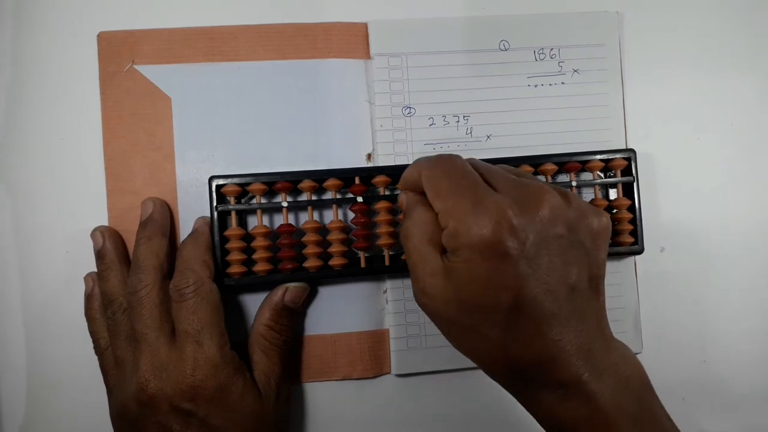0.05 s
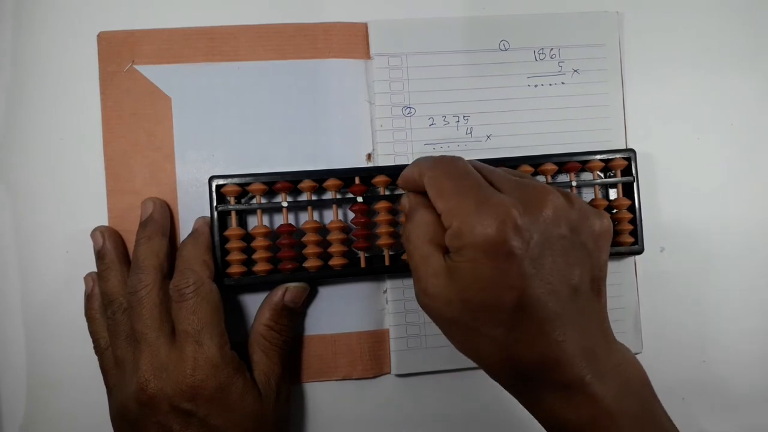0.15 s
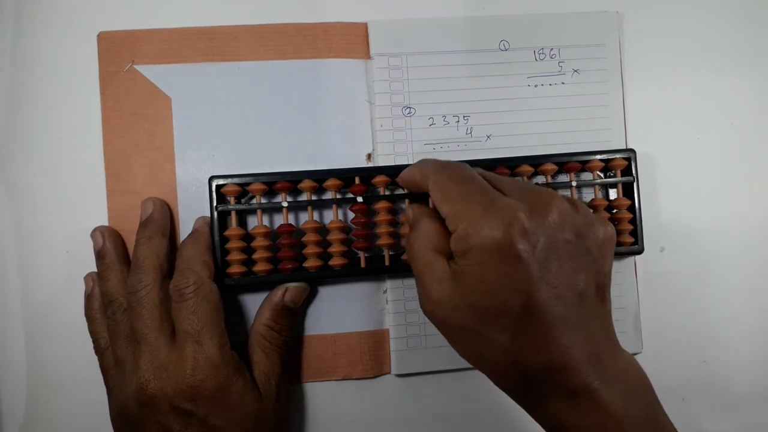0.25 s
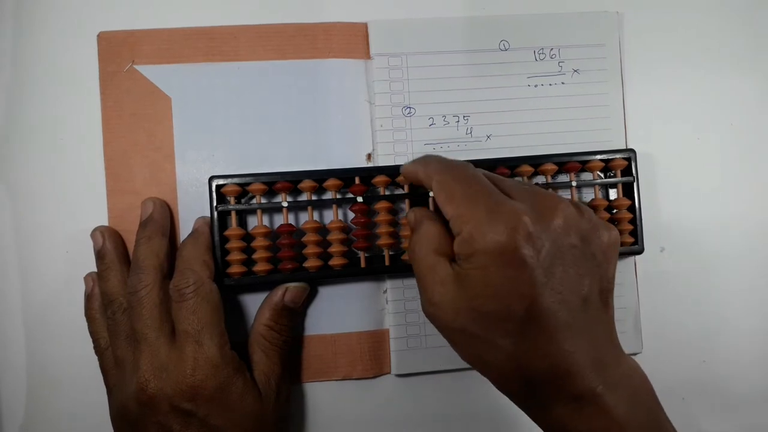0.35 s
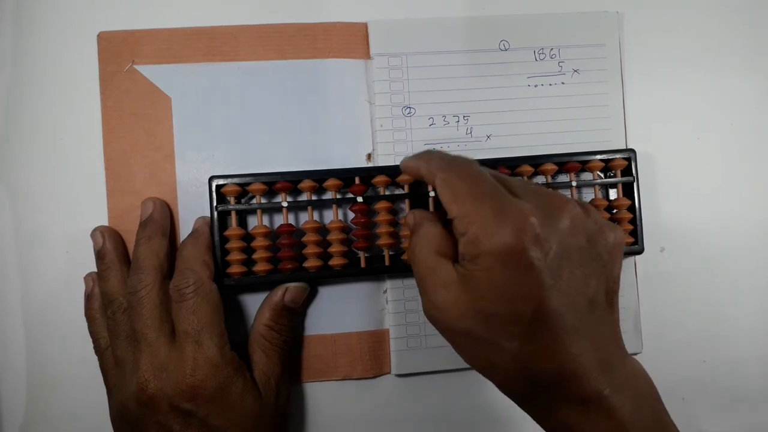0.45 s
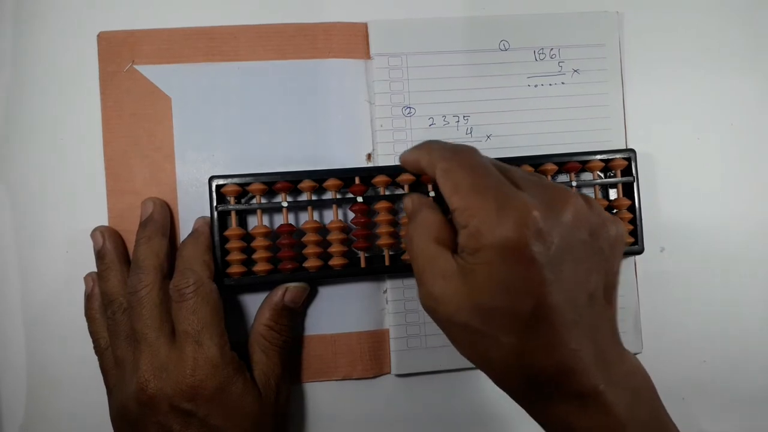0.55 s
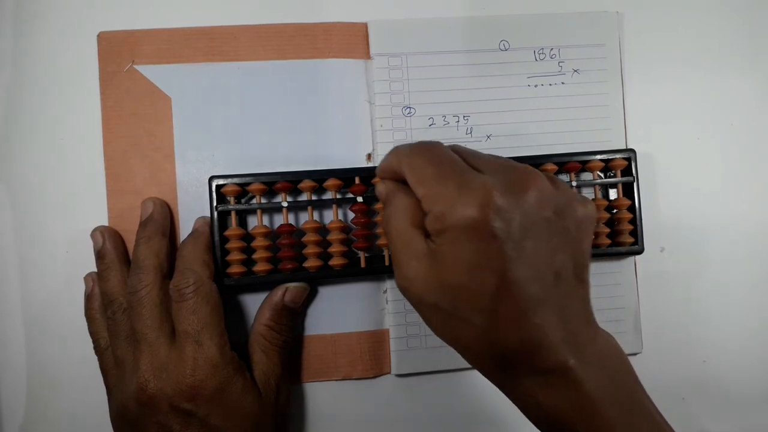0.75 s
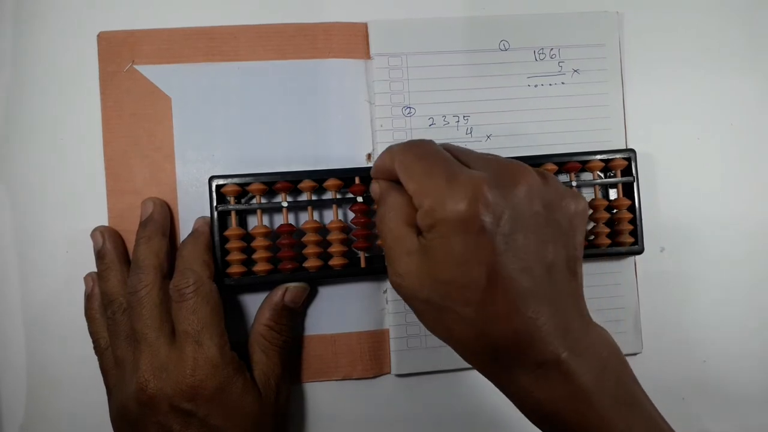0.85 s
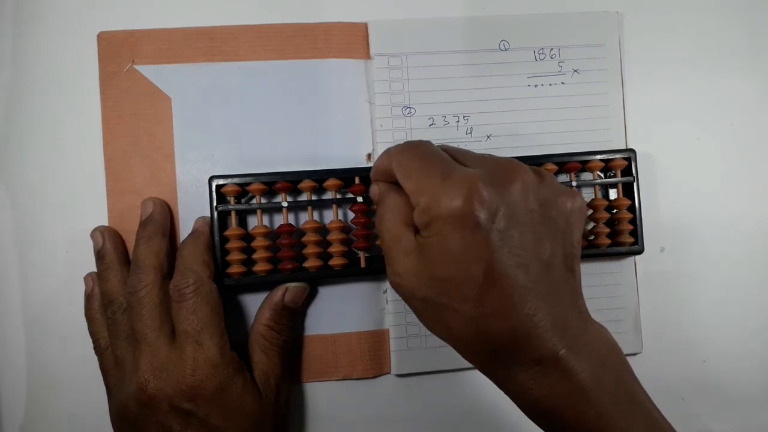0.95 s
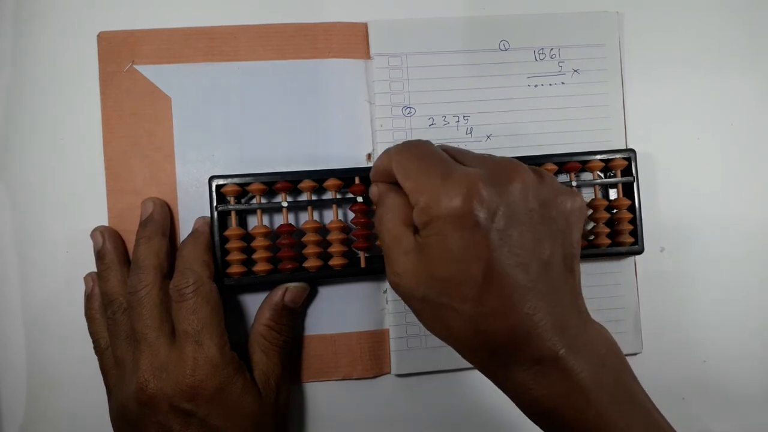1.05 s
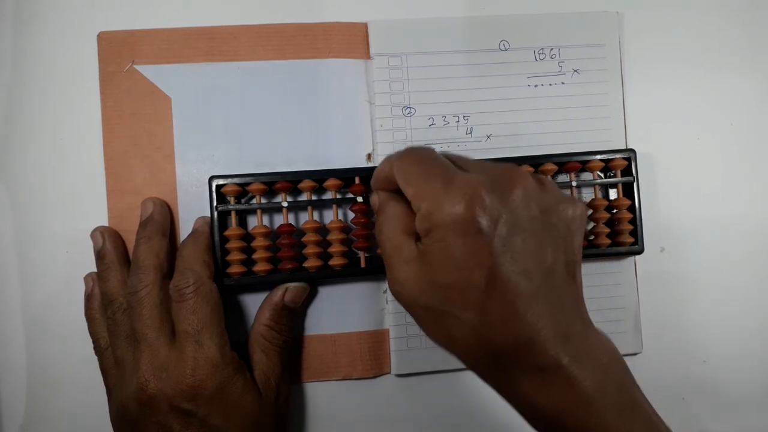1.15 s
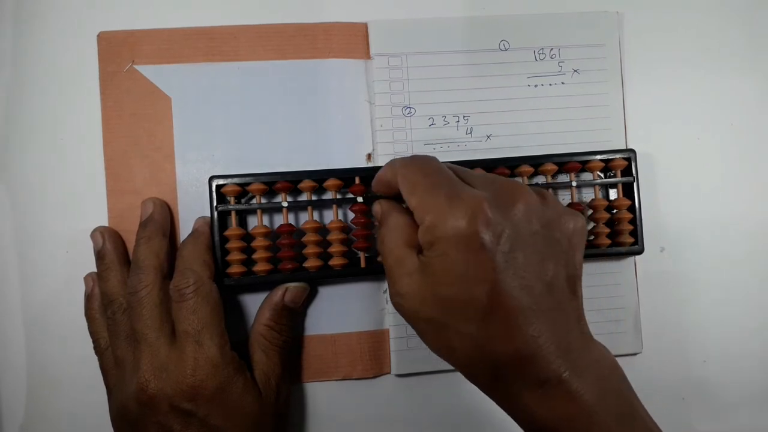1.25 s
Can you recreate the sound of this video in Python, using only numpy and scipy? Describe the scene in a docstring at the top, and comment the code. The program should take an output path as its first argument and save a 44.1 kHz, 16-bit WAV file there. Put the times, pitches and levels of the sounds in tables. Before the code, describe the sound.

Close-miked abacus beads click on a wooden frame: one bright sharp flick early, a softer double click soon after, a long gap, then two faint taps; thin insect hiss and chirrs behind in a small room.

```python
"""Abacus flicks among insects

Abacus beads are flicked along their rods close by: each flick is a frame knock plus a few
milliseconds of chatter, made of ringing tones and noise cracks, and nearby walls answer briefly.
Behind it, insects hiss and chirr as narrow bands of noise, over a low hum of wavering sine tones
and faint air noise."""
import sys
import numpy as np
from scipy import signal
from scipy.fft import rfft, irfft, next_fast_len
from scipy.io import wavfile
from scipy.ndimage import map_coordinates

SR = 44100
rng = np.random.default_rng(int(sys.argv[2]) if len(sys.argv) > 2 else 0)


def waveform_to_disk(signal):
    """Save audio, clipped to [-1, 1], as 16-bit WAV at the path in sys.argv[1]."""
    frames = np.transpose(np.atleast_2d(signal))
    scaled = np.clip(frames, -1, 1) * 32767
    samples = np.round(scaled).astype(np.int16)
    wavfile.write(sys.argv[1], SR, samples)


N = 57330  # length in samples
T = np.arange(N) / SR  # time in seconds

# Hum tones: pitch_hz, level_db
HUM_TONES = [(64, -60.5), (126, -69.5)]
# Colour of still air and far rumble: frequency_hz, relative_level_db (per Hz)
AIR_COLOUR = [(20, -9.5), (45, -9), (70, -1), (95, -1), (140, -1), (200, -9), (300, -15), (450, -22.5),
              (800, -26), (2500, -26.5), (8500, -29), (10500, -22), (12000, -29.5), (15500, -29.5)]
# Size of the air's left-right difference: frequency_hz, gain_db
AIR_SIDE_COLOUR = [(60, -25), (125, -29), (300, -15.5), (1200, -8), (3000, -8), (10000, -7.5)]
# Long trills of the insect chorus: start_s, end_s, pitch_hz, width_hz, level_db
CHORUS_TRILLS = [(-.2, 1.5, 10020, 330, -60.5), (-.2, 1.5, 5020, 250, -67.5), (-.2, 1.5, 7050, 230, -79),
                 (.5, 1.017, 5910, 348, -58.5), (.52, 0.99, 6880, 220, -67.5), (.46, 1.5, 3546, 116, -68.5),
                 (.83, 1.5, 4433, 87, -55.5)]
# Chirrs of the near insect: middle_s, half_length_s, pitch_hz, level_db
NEAR_CHIRRS = [(-0.008, 0.035, 4880, -55), (0.358, 0.056, 4840, -49.5), (0.555, 0.057, 4853, -48),
               (0.787, 0.048, 4820, -50), (1.012, 0.058, 4940, -54), (1.2, 0.065, 4970, -57.5)]
# Short falling chirps: start_s, level_db
FALLING_CHIRPS = [(0.027, -57.5), (0.087, -62.5), (.118, -61.5), (.158, -55.5), (.228, -52)]
# Bead flicks: start_s, level_db, chatter_length_s, low_tone_db, middle_tone_db, high_tone_db,
# top_tone_db, frame_knock_db
BEAD_FLICKS = [(0.2052, -14.5, 0.0063, -2.5, -2.5, 0, -2.5, -37),
               (0.4357, -27.5, .009, -4.5, 0.5, 0, 9.5, -25.5), (0.447, -37, 0.013, 1, 2, 12, 5, -33),
               (1.1884, -40.5, 0.00212, 12, 17.5, 9, -12, -32),
               (1.2525, -34, 0.00074, 1, 0.5, 0.5, 2.5, -9.5)]
# Points of a flick's tone curve: frequency_hz (low, middle, high, a fixed 0 dB point, top)
FLICK_TONE_HZ = [2900, 4700, 6400, 10500, 14500]
# Ringing tones of a bead: pitch_hz, relative_level_db, time_to_fall_60_db_s
BEAD_MODES = [(3340, -29, .014), (3920, -7, 0.0087), (4735, -8.5, 0.017), (6420, -5.5, 0.01),
              (7160, -3.5, 0.006), (9560, -0.5, 0.015), (10120, 4, 0.015), (11180, 3, 0.018),
              (12700, -8, 0.02), (13800, -12, 0.014)]
# Ringing tones of the frame: pitch_hz, relative_level_db, time_to_fall_60_db_s
FRAME_MODES = [(875, -0.5, 0.055), (938, -4.5, 0.12), (1270, -4.5, 0.066), (1850, -23, 0.019),
               (2720, 4.5, 0.023)]
# Noise colour of a contact's crack: frequency_hz, relative_level_db
CRACK_COLOUR = [(400, 1.5), (1000, -5.5), (1900, -7), (2500, -18.5), (3200, -0.5), (8300, -7.5),
                (10500, -1.5), (12500, -1), (15500, -5)]
# Beads sliding on their rods under the fingers: middle_s, half_length_s, level_db
BEAD_SLIDES = [(1.184, 0.042, -54.5), (1.238, 0.03, -55.5)]
# Noise colour of the sliding: frequency_hz, relative_level_db
SLIDING_COLOUR = [(600, -59), (2200, -15), (3600, -7.5), (6000, -13), (8500, -5), (11000, 0), (13000, -11),
                  (15500, -23)]
# How long the walls' answer lasts: frequency_hz, time_to_fall_60_db_s
ROOM_DECAY = [(300, 0.22), (1500, 0.17), (5000, 0.29), (10000, 0.37), (15000, 0.21)]
# Tone of the walls' answer: frequency_hz, gain_db
ECHO_COLOUR = [(400, 0), (900, 1.5), (1500, 8), (3500, 7), (8300, 1.5), (10500, -4), (14000, 1.5)]

AIR_DB = -57
HUM_WAVER_DB, HUM_DRIFT_RAD = 6, 0.49
TRILL_FADE_S, TRILL_WAVER_DB = 0.24, 1.63
CHIRR_WIDTH_HZ = 211
CHIRP_S, CHIRP_HZ, CHIRP_WIDTH_HZ, CHIRP_FALL_HZ_PER_S = 0.046, 5330, 130, 9400
CHATTER_LOSS_DB, CHATTER_SCATTER_DB = 16, 3
CRACK_DB, CRACK_T60_S = -4.5, 0.0079  # T60: time to fall by 60 dB
MODE_SCATTER_DB, PITCH_SPREAD = 1.5, 0.02  # pitch spread is a fraction of the pitch
CONTACT_S, KNOCK_S = 0.00029, 0.00033  # rise times
BEAD_LOW_HZ = 1534  # small beads radiate no bass
ROOM_DB, ROOM_WIDTH, ROOM_BUILD_S = -13, 0.027, 0.0012
TOP_HZ = 15800


def amp(db):
    """Turn decibels into gain."""
    return 10 ** (np.asarray(db) / 20)


def unit(x):
    """Scale a sound to an average (rms) strength of 1."""
    return x / np.sqrt(np.mean(x ** 2) + 1e-20)


def along(points, hz):
    """Read a curve of (frequency, value) points on a logarithmic frequency axis."""
    f, v = np.transpose(points)
    return np.interp(np.log(hz + 1), np.log(f + 1), v)


def wobble(rate):
    """Make a smooth random curve with this many random points a second."""
    points = rng.standard_normal(int(N * rate / SR) + 4)
    return map_coordinates(points, [T * rate])


def filtered(x, response):
    """Multiply each frequency of a sound by a gain."""
    m = next_fast_len(N + SR // 2)  # spare room keeps the end from wrapping to the start
    gain = response(np.fft.rfftfreq(m, 1 / SR))
    return irfft(rfft(x, m) * gain, m)[..., :N]


def noise(colour):
    """Make noise of rms 1 with the given colour."""
    hiss = rng.standard_normal(N)
    return unit(filtered(hiss, lambda f: amp(along(colour, f))))


def background():
    """A wavering low hum in faint air noise, nearly the same on both sides."""
    hum = np.zeros(N)
    for hz, db in HUM_TONES:
        level = amp(db + HUM_WAVER_DB * wobble(14)) * np.sqrt(2)
        drift = HUM_DRIFT_RAD * wobble(13.85)
        hum += level * np.sin(2 * np.pi * hz * T + drift)
    side = filtered(noise(AIR_COLOUR), lambda f: amp(along(AIR_SIDE_COLOUR, f)))
    return hum + amp(AIR_DB) * (noise(AIR_COLOUR) + np.array([side, -side]))


def rasp(hz, width_hz):
    """Dense tooth strikes through one wing resonance: noise narrowed around one pitch, rms 1."""
    strikes = rng.standard_normal(N)
    return unit(filtered(strikes, lambda f: (1 + ((f - hz) / (2 * width_hz)) ** 2) ** -2))


def trills():
    """Long insect trills: rasps that fade in and out while their level wavers."""
    out = np.zeros(N)
    for start, end, hz, width_hz, db in CHORUS_TRILLS:
        gate = np.clip(np.minimum(T - start, end - T) / TRILL_FADE_S + 0.5, 0, 1)
        level = amp(db + TRILL_WAVER_DB * wobble(19.97))
        out += level * gate * rasp(hz, width_hz)
    return out


def chirps():
    """Short rough chirps: rasps whose pitch slides steadily down."""
    out = np.zeros(N)
    for start, db in FALLING_CHIRPS:
        age = np.clip(T - start, 0, CHIRP_S)
        swell = np.sin(np.pi * age / CHIRP_S)
        fall = np.exp(-1j * np.pi * CHIRP_FALL_HZ_PER_S * age ** 2)
        # the Hilbert transform lets the whole band shift down together
        sliding_rasp = np.real(signal.hilbert(rasp(CHIRP_HZ, CHIRP_WIDTH_HZ)) * fall)
        out += amp(db) * swell * sliding_rasp
    return out


def chirrs():
    """Chirrs of the near insect: rasps that swell and sink."""
    out = np.zeros(N)
    for middle, half, hz, db in NEAR_CHIRRS:
        swell = np.exp(-np.abs((T - middle) / half) ** 3 / 2)
        out += amp(db) * swell * rasp(hz, CHIRR_WIDTH_HZ)
    return out


def ring(modes, t):
    """Struck wood or bead: dying tones, each a little different at every contact."""
    tones = np.zeros(len(t))
    for hz, db, t60 in modes:
        level = amp(db + rng.normal(0, MODE_SCATTER_DB) - 60 * t / t60)
        pitch = hz * (1 + rng.normal(0, PITCH_SPREAD))
        tones += level * np.sin(2 * np.pi * pitch * t)
    return tones * (1 - np.exp(-t / CONTACT_S))


def bead_chatter(length, count=10):
    """Beads touch several times, on average ever more weakly and sparsely; each contact rings and cracks."""
    t = np.arange(SR // 12) / SR
    chatter, hiss = np.zeros(N), noise(CRACK_COLOUR)
    for k in range(count):
        jitter = rng.uniform(-0.33, 0.3) * (k > 0)
        share = ((k + jitter) / (count - 1)) ** 1.4  # how far through the chatter
        age = np.maximum(t - share * length, 0)
        fresh_hiss = np.roll(hiss, k * len(t))[:len(t)]
        fade = amp(CRACK_DB - 60 * age / CRACK_T60_S)
        crack = fade * (1 - np.exp(-age / CONTACT_S)) * fresh_hiss
        strength = amp(rng.normal(0, CHATTER_SCATTER_DB) - CHATTER_LOSS_DB * share)
        chatter[:len(t)] += strength * (ring(BEAD_MODES, age) / 2 + crack)
    bass_cut = signal.butter(2, BEAD_LOW_HZ, "highpass", fs=SR, output="sos")
    return signal.sosfilt(bass_cut, chatter)


def frame_knock(db):
    """The frame is knocked once and its own tones ring."""
    t = np.arange(SR // 12) / SR
    knock = np.zeros(N)
    knock[:len(t)] = amp(db) * ring(FRAME_MODES, t) * (1 - np.exp(-t / KNOCK_S)) / 2
    return knock


def flick(length, tone_db, frame_db):
    """One flick: a frame knock plus bead chatter with its own tone."""
    tone_curve = list(zip(FLICK_TONE_HZ, tone_db))
    chatter = filtered(bead_chatter(length), lambda f: amp(along(tone_curve, f)))
    return frame_knock(frame_db) + chatter


def slides():
    """Beads rub along their rods: coloured noise with a quick, grainy change of level."""
    push = sum(amp(db) * np.exp(-((T - middle) / half) ** 2) for middle, half, db in BEAD_SLIDES)
    grain = amp(1.4 * wobble(500))
    return push * unit(noise(SLIDING_COLOUR) * grain)


def beads():
    """All flicks placed in time, together with the sliding."""
    out = np.zeros(2 * N + SR)
    for start, db, length, low_db, middle_db, high_db, top_db, frame_db in BEAD_FLICKS:
        tone_db = [low_db, middle_db, high_db, 0, top_db]
        out[round(start * SR):][:N] += amp(db) * flick(length, tone_db, frame_db)
    return out[:N] + slides()


def room(x):
    """The walls' diffuse answer: each band's energy builds up, then dies at its own speed."""
    hz, t, bands = signal.stft(x, SR, nperseg=64)
    # energy falls by 60 dB in the listed time, hence 120 with amp()
    decay = amp(-120 * t / along(ROOM_DECAY, hz)[:, None]) * (1 - np.exp(-t / ROOM_BUILD_S))
    decay = decay / decay.sum(1, keepdims=True)
    energy = np.abs(signal.fftconvolve(np.abs(bands) ** 2, decay, axes=1))[:, :len(t)]
    # noise carries the energy, so no single echo stands out
    scatter = signal.stft(rng.standard_normal((2, N)), SR, nperseg=64)[2]
    shaped = scatter / np.std(scatter) * np.sqrt(energy)
    mid, side = signal.istft(shaped, SR, nperseg=64)[1][:, :N]
    return np.array([mid + ROOM_WIDTH * side, mid - ROOM_WIDTH * side])


def scene():
    """The abacus and its echo in front, insects and hum behind."""
    behind = background() + trills() + chirps() + chirrs()
    abacus = beads()
    echo = filtered(room(abacus), lambda f: amp(ROOM_DB + along(ECHO_COLOUR, f)))
    return behind + abacus + echo


def record(dry):
    """Remove the treble above the band limit, with a 600 Hz wide slope around it."""
    return filtered(dry, lambda hz: np.clip((TOP_HZ - hz) / 600 + 0.5, 0, 1))


dry = scene()
out = record(dry)
waveform_to_disk(out)
```